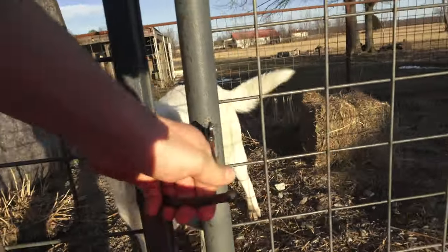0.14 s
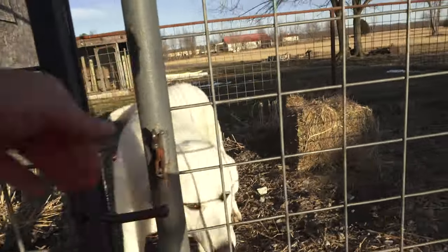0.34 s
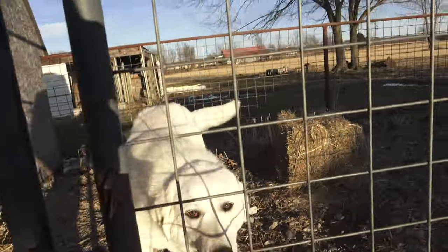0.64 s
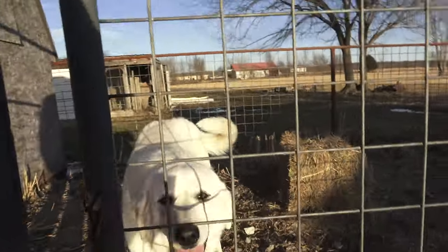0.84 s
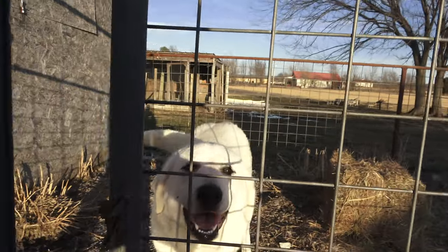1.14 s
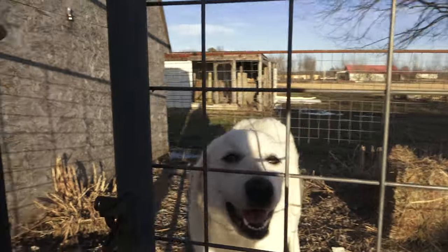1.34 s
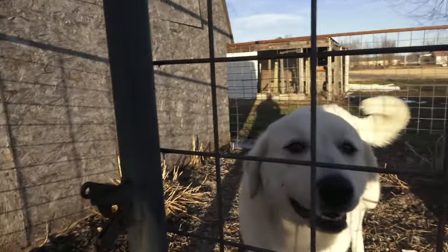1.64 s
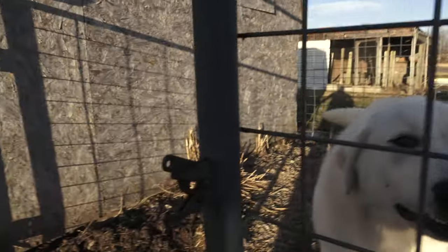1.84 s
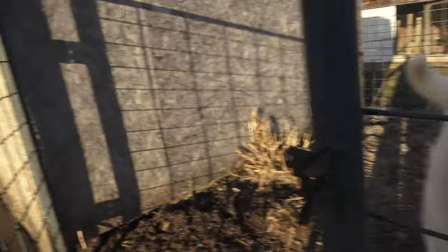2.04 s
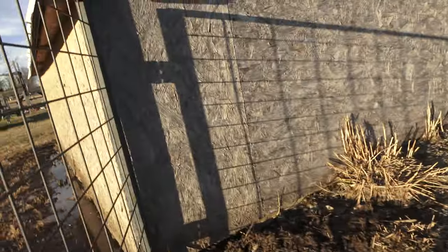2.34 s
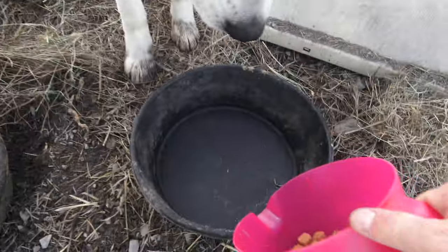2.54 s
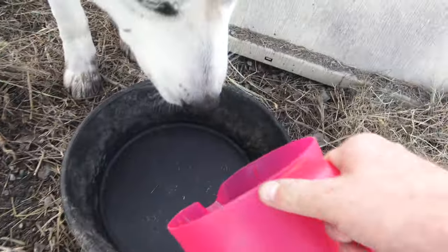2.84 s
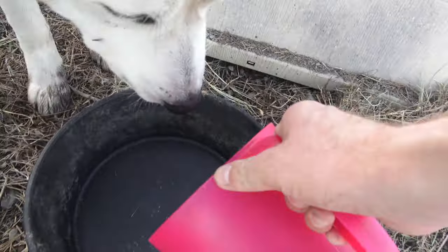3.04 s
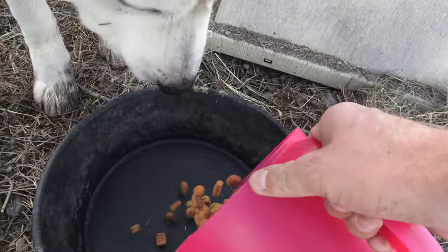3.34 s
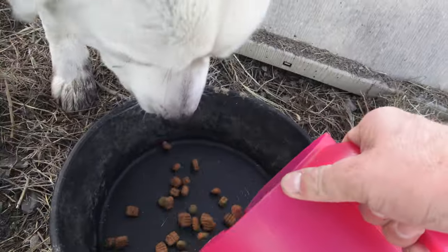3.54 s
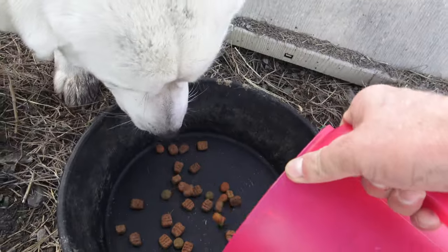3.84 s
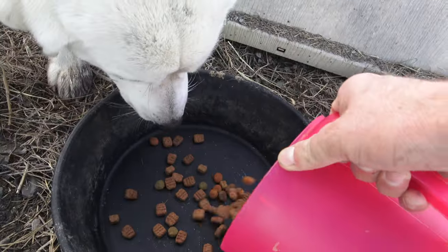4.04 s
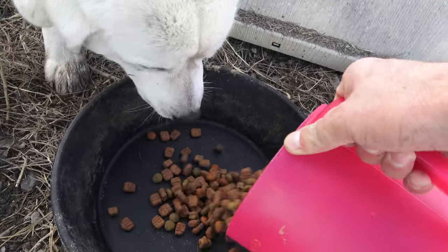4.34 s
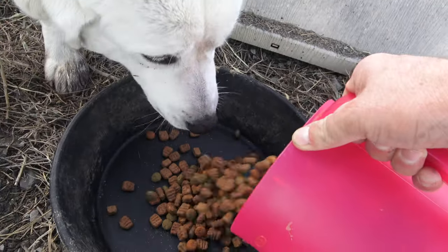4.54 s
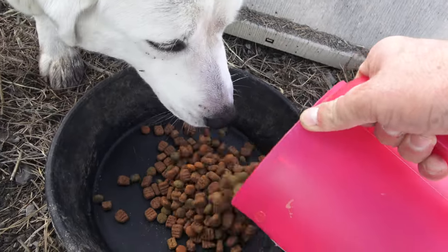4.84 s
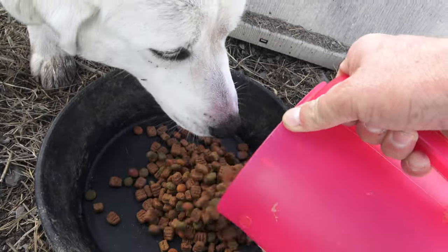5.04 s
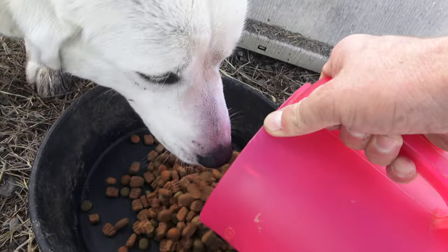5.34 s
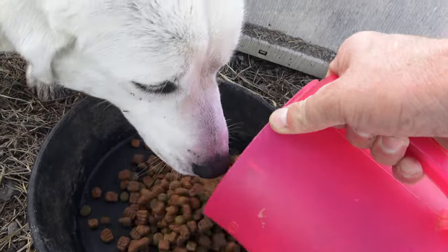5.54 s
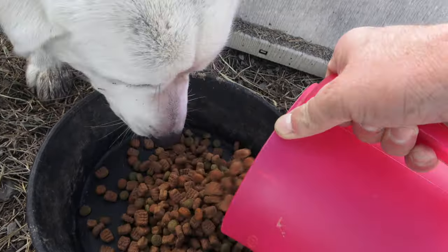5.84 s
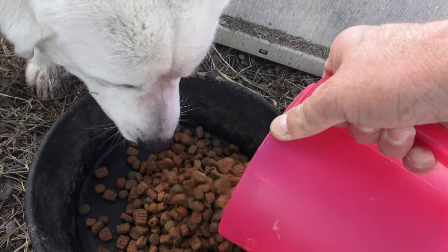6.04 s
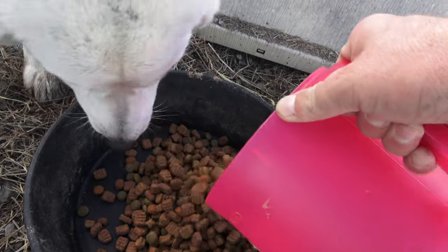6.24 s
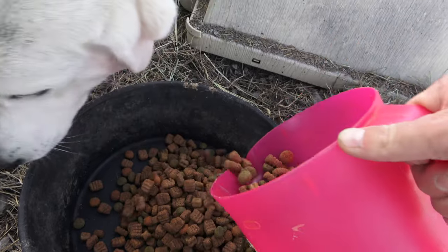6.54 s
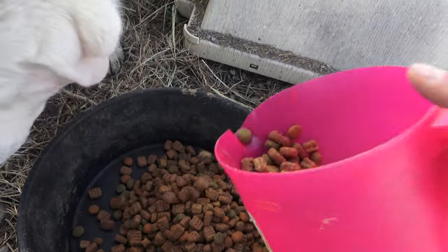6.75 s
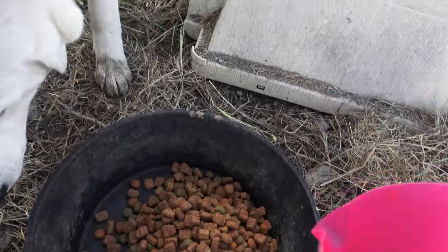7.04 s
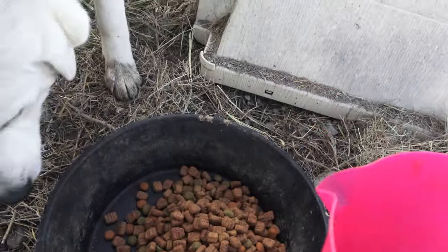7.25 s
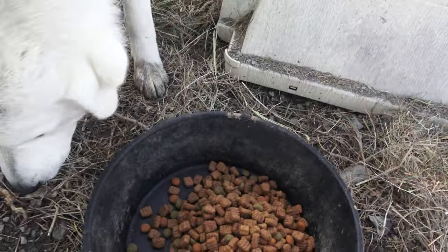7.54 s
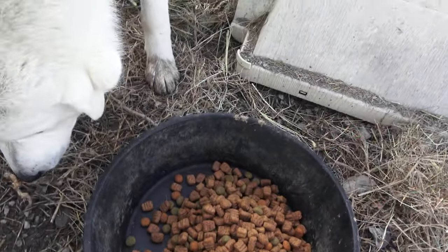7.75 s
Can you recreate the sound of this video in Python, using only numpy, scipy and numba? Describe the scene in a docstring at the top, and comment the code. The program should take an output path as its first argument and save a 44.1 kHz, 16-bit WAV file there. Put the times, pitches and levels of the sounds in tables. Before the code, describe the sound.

The scene is outdoors and close, with a soft hush of air and low wind rumble on the microphone. At the start a wire gate shimmers faintly, and its metal latch clicks at about 0.4 seconds. Footsteps brush and crunch through dry straw until about 2 seconds, with small stalk snaps and a low gust thump near 1.2 seconds. From 2.6 seconds, dry dog food rattles and clacks sharply in a plastic scoop. At 3.3 seconds the first pellets land in a rubber pan with hollow pocks. From 4 seconds the pour becomes a loud, dense clatter, the thuds softening as pellets click on the growing heap. It thins after 6.3 seconds and ends around 7. The remaining pellets slide back into the scoop with a short hollow rattle, and the scoop bumps the rim softly at 7.3 seconds. A faint straw rustle follows as the air fades.

```python
"""Kibble rattles in a plastic scoop and pours into a rubber pan: pellets thud on the bare bottom, then
click on the growing heap. The scoop tips upright, the rest slides back and the scoop bumps the pan rim.
Before the pour, a wire gate is latched and steps crunch over dry straw. Every pellet and stalk is a tiny
strike on a bank of damped modes. Underneath lie an outdoor hush and wind rumbling on the microphone."""
import sys
import numpy as np
from scipy import signal
from scipy.fft import rfft, irfft, next_fast_len
from scipy.io import wavfile
from scipy.ndimage import uniform_filter1d, minimum_filter1d
from numba import njit

SR = 44100
rng = np.random.default_rng(int(sys.argv[2]) if len(sys.argv) > 2 else 0)


def transcribe(signal):
    """Save signal, clipped to [-1, 1], as a 16-bit WAV file at the path in sys.argv[1]."""
    frames = np.atleast_2d(signal).T
    limited = np.clip(frames, -1, 1)
    pcm = np.round(limited * 32767).astype(np.int16)
    wavfile.write(sys.argv[1], SR, pcm)


N = 347447
TIME = np.arange(N) / SR
CONTROL_TIME = TIME[::100]   # coarse clock for envelopes

# Levels are relative within each table. A swell is a bell curve: t is its crest, width its sigma.
# hush of still air and distant country: t/s, level/dB
AIR_FADER = [(0, -31.5), (1.9, -34), (2.3, -38), (3.0, -29), (7.3, -37.5), (7.88, -46.5)]
# spectrum of that hush: f/Hz, level/dB
AIR_EQ = [(53, -32), (90, -15.5), (143, -11), (163, -17), (197, -17), (253, -17.5), (320, -14), (395, -18),
          (744, -13), (1230, -28), (1370, -27.5), (2930, -31), (7430, -50.5), (14000, -52)]
# spectrum of the wind rumble: f/Hz, level/dB
WIND_EQ = [(7.1, 3), (12, 13), (21, 3), (30, -15.5), (52, -12.5), (123, -32), (145, -35), (220, -38),
           (290, -35.5), (480, -120)]
# dull low thumps, gusts on the microphone and last the scoop bumping the pan rim: t/s, level/dB, width/s
THUMP_SWELLS = [(0.17, -17, 0.038), (1.175, -3.5, 0.026), (1.77, -17, 0.08), (7.314, -18, 0.0058)]
# spectrum of a thump: f/Hz, level/dB
THUMP_EQ = [(24, 2), (42, 2.5), (85, -14.5), (160, -30)]

# gate panel modes, each widened by many near-equal wires: f/Hz, bandwidth/Hz, level/dB, t60/s
PANEL_MODES = [(201, 18, -48, 3.4), (229.5, 11, -39.5, 11.3), (350, 28.3, -52, 1.66), (790, 50, -26, 0.84),
               (892, 82, -30, 2.3), (1350, 170, -36.5, 1.2), (2100, 260, -32, 1.8)]
# the latch drops: t/s, level/dB
LATCH_HIT = [(0.446, -0.5)]
# modes of latch and gate under that hit: f/Hz, level/dB, t60/s
LATCH_RING = [(880, -3.5, 0.034), (1130, 1, 0.015), (1420, -6, 0.02523), (1660, -6, 0.023),
              (2080, -1, 0.017), (2560, -0.5, 0.028), (3500, -11.5, 0.022), (5473.3, -18, 0.01735)]

# feet brushing through straw: t/s, level/dB, width/s
BRUSH_SWELLS = [(0.01, -28.5, 0.076), (0.39, -40.5, 0.064), (0.82, -33.5, 0.077), (1.03, -31.5, 0.058),
                (1.29, -36, 0.045), (1.68, -30.5, 0.098), (1.85, -27, 0.032), (2.04, -38.5, 0.041),
                (2.5, -32.5, 0.04), (7.63, -53, 0.076)]
# footfalls crushing straw: t/s, level/dB, width/s
FOOT_SWELLS = [(0.016, -21, 0.014), (0.825, -17, 0.012), (0.976, -15.5, 0.012), (1.366, -17.5, 0.021),
               (1.903, -18, 0.018)]
# single stalks snapping: t/s, level/dB, f/Hz
STALK_SNAPS = [(0.3541, -18.5, 1940), (0.6983, -20, 2777), (0.8078, -18, 3260), (0.9637, -12.5, 2410),
               (1.214, -24, 3746), (1.3553, -9, 1280), (1.729, -11.5, 2400), (2.0335, -17, 2830),
               (2.139, -22, 1350), (7.5642, -32, 1750)]
# spectrum of dry straw: f/Hz, level/dB
STRAW_EQ = [(300, -9.5), (450, -21), (880, -1.5), (1150, -14.5), (2400, -11), (3500, -11.5), (5500, -22.5),
            (7000, -29), (12500, -35), (16000, -41)]

# clumps of pellets shifting along the tilted scoop: t/s, level/dB, width/s
RATTLE_SWELLS = [(2.665, -18.5, 0.039), (2.87, -28.5, 0.031), (3.14, -14.5, 0.034), (3.25, -15, 0.042),
                 (3.36, -17, 0.037), (3.825, -20, 0.021), (3.98, -18, 0.013), (4.12, -22.5, 0.018),
                 (4.86, -19.5, 0.056), (5.29, -14.5, 0.031), (5.69, -23, 0.06), (6.08, -26, 0.014),
                 (6.21, -24, 0.025), (6.67, -36, 0.03)]
# hardest knocks of pellets on plastic and on each other: t/s, level/dB, f/Hz, crispness/dB
CLACK_HITS = [(2.599, 5, 3570, -18), (2.639, 2.5, 3040, -19), (2.658, -3.5, 3420, -21),
              (2.79, -7, 2900, -33), (2.836, -5, 2980, -25), (2.845, -7, 2700, -47),
              (2.969, -10, 1540, -40), (3.017, -6.5, 1650, -61), (3.06, 2, 2530, -59.5),
              (3.12, 6, 3260, -25), (3.137, 5, 1860, -29), (3.19, 1, 2980, -25), (3.205, 14, 3150, -18),
              (3.247, 2, 2810, -32), (3.271, 5, 2900, -42), (3.296, -3, 3070, -39.5), (3.359, 7, 2510, -29),
              (3.395, 4, 1410, -35), (3.434, -1, 2024, -33), (3.712, -4.5, 1680, -40),
              (3.757, 0.5, 2400, -27), (3.909, 4.5, 2480, -22), (3.945, -6.5, 1370, -32),
              (4.006, -1.5, 1910, -30.5), (4.067, -4, 1620, -30), (5.293, -1, 2590, -28),
              (6.611, -9.5, 2620, -43), (6.639, -4, 2634, -26), (6.88, -15, 2220, -32),
              (7.216, 5, 2860, -38), (7.297, -16, 2050, -43), (7.405, -11, 1540, -59)]
# spectrum of pellets on the plastic scoop: f/Hz, level/dB
SCOOP_EQ = [(350, -27.5), (700, 3.5), (1220, -14), (1900, -10.5), (2500, -11), (3000, -7.5), (4100, -18.5),
            (5500, -29.5), (7200, -49), (10400, -43), (16000, -60)]
# spectrum of pellets sliding back: f/Hz, level/dB
SLIDE_EQ = [(270, -3), (314, -0.5), (450, -13), (797, 2), (1070, -12), (1340, -12), (2900, -9), (3800, -12),
            (6300, -39), (10000, -63), (16000, -58)]
# air resonances of the upright scoop: f/Hz, bandwidth/Hz, level/dB
HOLLOW_MODES = [(320, 66, 13), (775, 140, 5), (1570, 254, 7), (2070, 210, 2), (2587, 720, 1)]

# pellets leaving the scoop, a first spill and then the main pour: t/s, level/dB
POUR_FLOW = [(3.28, -16.5), (3.5, 1), (3.65, -5), (3.76, -8), (3.96, -7.5), (4.058, -1.5), (4.4, 0),
             (4.9, -1), (5.13, -2.5), (5.4, -1.5), (5.85, -3), (6.17, -2), (6.3, -5.5), (6.6, -9),
             (6.8, -5.5), (6.94, -14), (7.05, -14.5)]
# heaviest landings on the rubber bottom: t/s, level/dB, f/Hz
PAN_HITS = [(3.308, -1, 563), (3.368, 11, 643), (3.397, 1, 490), (3.434, 2, 466), (3.47, 2, 474),
            (3.545, -0.5, 525), (3.576, -3.5, 552), (3.624, 1.5, 473), (3.712, -1, 550.4), (3.787, -9, 593),
            (3.834, 2.5, 484), (3.908, 6, 483.5), (3.943, -1, 770), (4.005, 3, 484), (4.077, 0, 590),
            (4.14, 2, 488), (4.257, 2, 503), (4.627, -3, 829), (4.764, -2.5, 777.6), (6.99, -9, 550)]
# spectrum of the rubber pan: f/Hz, level/dB
PAN_EQ = [(270, -9), (320, -25), (420, 3), (490, 8), (600, 1.5), (810, 4), (920, -3), (1090, -28),
          (1400, -14)]
# spectrum of pellet on pellet: f/Hz, level/dB
HEAP_EQ = [(900, -1), (1200, -5.5), (2000, -3.5), (3200, -5.5), (4000, -13), (5400, -15), (7500, -26),
           (11000, -30.5), (16000, -51)]
# sharp ticks of single crusts: t/s, level/dB
CRUST_TICKS = [(3.3662, -11), (3.492, -18), (3.55, -10.5), (3.5829, -17), (3.613, -11.5), (3.6427, -12),
               (3.8333, -9), (6.3525, -15), (6.4928, -19), (6.8249, -15), (6.989, -19)]
# spectrum of rough crusts grazing: f/Hz, level/dB
CRUST_EQ = [(3500, 16.5), (6000, -7.5), (10000, -8), (16000, -14)]

COVER_FROM_S, COVER_TAKES_S = 3.65, 0.6   # the heap spreads over the pan bottom
CUTOFF_HZ = 16000


def from_db(db):
    """Decibels to gain."""
    return 10 ** (np.asarray(db) / 20)


def unit_rms(x):
    """Scale to rms 1."""
    return x / np.sqrt(np.mean(x ** 2) + 1e-20)


def fader(t, db):
    """Smooth gain per sample from a dB curve, silent outside it."""
    return uniform_filter1d(from_db(np.interp(TIME, t, db, left=-120, right=-120)), SR // 100)


def swells(rows):
    """Sum bell-shaped swells into one gain curve on the control clock."""
    return sum(from_db(db) * np.exp(-.5 * np.minimum(((CONTROL_TIME - t) / width) ** 2, 60))
               for t, db, width in rows)


def audible(gain):
    """Times and dB of a control curve, trimmed to its audible stretch."""
    heard = np.flatnonzero(gain > 1e-4)
    stretch = slice(heard[0], heard[-1])
    return CONTROL_TIME[stretch], 20 * np.log10(gain[stretch])


def eq_db(eq, hz):
    """Read an EQ curve on a log-frequency axis."""
    freq, db = np.transpose(eq)
    return np.interp(np.log(hz), np.log(freq), db)


def low_cut(x, hz):
    """Steep high-pass: small bodies radiate no bass."""
    return signal.sosfilt(signal.butter(6, hz, "high", fs=SR, output="sos"), x + 1e-18)


def levelled(x, window_s):
    """Ride the gain to hold the short-term rms near 1."""
    size = max(int(window_s * SR), 2)
    power = uniform_filter1d(uniform_filter1d(x ** 2, size), size)
    return x / np.sqrt(np.abs(power) + 1e-4 * np.mean(x ** 2))


def noise(eq):
    """Steady noise at rms 1, shaped by an EQ curve and rolled off steeply past its ends."""
    size = next_fast_len(N, real=True)
    hz = np.arange(1, size // 2 + 2) * SR / size
    roll_off = 1 / (1 + (eq[0][0] / hz) ** 4) / (1 + (hz / eq[-1][0]) ** 4)
    spectrum = rfft(rng.standard_normal(size)) * from_db(eq_db(eq, hz)) * roll_off
    return unit_rms(irfft(spectrum, size)[:N])


def ring(clicks, hz, t60):
    """A unit click starts a decaying sine of height 1."""
    decay, omega = from_db(-60 / (t60 * SR)), 2 * np.pi * hz / SR
    return signal.lfilter([0, np.sin(omega)], [1, -2 * decay * np.cos(omega), decay ** 2], clicks + 1e-18)


@njit
def mode_bank(onsets, kicks, a1, a2, size):
    """Two-pole resonators, kicked at the sorted sample indices in onsets."""
    out, hit = np.zeros(size), 0
    now, before = np.zeros(len(a1)), np.zeros(len(a1))
    for i in range(size):
        while hit < len(onsets) and onsets[hit] == i:
            now += kicks[hit]
            hit += 1
        for m in range(len(a1)):
            out[i] += now[m]
            now[m], before[m] = a1[m] * now[m] - a2[m] * before[m] + 1e-18, now[m]
    return out


def strike(t, db, pitch, crisp_db, eq, cycles, focus_db, focus_octaves):
    """Each contact rings a dense set of damped modes, boosted by focus_db around its own pitch."""
    hz = np.geomspace(eq[0][0], min(eq[-1][0], CUTOFF_HZ), num=44)
    hz = hz * (hz[1] / hz[0]) ** rng.uniform(-0.43, 0.47)   # detune the whole bank
    t60 = cycles / hz + .003
    focus = np.exp(-.5 * (np.log2(hz / pitch[:, None]) / focus_octaves) ** 2)
    treble_shelf = 1 / (1 + (5500 / hz) ** 6)
    kicks = from_db(eq_db(eq, hz) + focus_db * focus + np.outer(crisp_db, treble_shelf)) * np.sqrt(hz)
    scatter = rng.uniform(-1, 1, kicks.shape)
    kicks *= scatter + .5 * np.sign(scatter)
    kicks *= (from_db(db) / np.linalg.norm(kicks, axis=1))[:, None]
    # high modes die sooner, so they start higher for the same energy
    kicks *= np.sqrt(np.interp(np.median(pitch), hz, t60) / t60)
    onsets = np.clip((t * SR).astype(int), 0, N - 1)
    order = np.argsort(onsets)
    start, end = onsets.min(), min(onsets.max() + SR // 8, N)
    decay, omega = from_db(-60 / (t60 * SR)), 2 * np.pi * hz / SR
    ringing = mode_bank(onsets[order] - start, kicks[order] * np.sin(omega),
                        2 * decay * np.cos(omega), decay ** 2, end - start)
    ringing = signal.sosfilt(signal.butter(2, hz[0], "high", fs=SR, output="sos"), ringing)
    return np.pad(ringing, (start, N - end))


def grains(t, db, eq, crisp_db, per_s, spread_db, cycles, focus_db, window_s, banks):
    """A cloud of random strikes, on one mode bank after another; a weaker flow is quieter and sparser."""
    times = np.arange(t[0], t[-1], 1 / per_s)
    jitter, size, tuning, chance = rng.random((len(times), 4)).T
    times = times + 2 * jitter / per_s
    density = np.sqrt(from_db(np.interp(times, t, db) - np.max(db)))
    grain_db = spread_db * np.minimum(-np.log(1 - size), 3) - 30 * (chance > density)
    pitch = eq[0][0] * (eq[-1][0] / eq[0][0]) ** tuning
    contacts = np.array([times, grain_db, pitch, np.full(len(times), crisp_db)])
    cloud = sum(strike(*batch, eq, cycles, focus_db, focus_octaves=0.21)
                for batch in np.array_split(contacts, banks, axis=1))
    return fader(t, db) * levelled(cloud, window_s)


def air():
    """The bed: a soft hush of still air and distant country."""
    return fader(*np.transpose(AIR_FADER)) * noise(AIR_EQ)


def wind():
    """Slow lumps of pressure; the rumble drops as the microphone is lowered to the pan."""
    lowering_s, open_db, sheltered_db = (2.43, 4.8), -13, -29
    rumble_db = np.interp(TIME, lowering_s, [open_db, sheltered_db])
    return from_db(rumble_db) * levelled(noise(WIND_EQ), window_s=0.067)


def low_thumps():
    """Dull swells of low noise: gusts on the microphone, and last the scoop bumping the pan rim."""
    return fader(*audible(swells(THUMP_SWELLS))) * levelled(noise(THUMP_EQ), window_s=0.043)


def reflections(x, t60, dull_hz):
    """A brief, dull scatter off the pan wall, the ground and the shed."""
    t = TIME[:SR // 4]
    tail = rng.standard_normal(len(t)) * from_db(-60 * t / t60) * (t > .0015)
    wet = signal.fftconvolve(x, tail / np.linalg.norm(tail))[:N]
    return signal.sosfilt(signal.butter(1, dull_hz, fs=SR, output="sos"), wet)


def gate():
    """The wire panel still shimmers from being pulled shut as the latch drops into its catch."""
    panel = 0
    for hz, width, db, t60 in PANEL_MODES:
        band = signal.butter(2, [hz - width / 2, hz + width / 2], "band", fs=SR, output="sos")
        wires = unit_rms(signal.sosfilt(band, rng.standard_normal(N)))
        panel += wires * from_db(db - 60 * TIME / t60)
    (hit_s, hit_db), = LATCH_HIT
    drop = signal.unit_impulse(N, int(hit_s * SR))
    latch = sum(ring(drop, hz, t60) * from_db(db) * (-1) ** k for k, (hz, db, t60) in enumerate(LATCH_RING))
    return panel + from_db(hit_db - 12.5) * latch


def straw_steps():
    """Dry stalks swish past the feet and crush under them; a few snap singly."""
    rustle_db, walk_end_s = -45, 2.15
    t, db = audible(swells(BRUSH_SWELLS) + from_db(rustle_db) * (CONTROL_TIME < walk_end_s))
    brush = grains(t, db, STRAW_EQ, crisp_db=-2.1, per_s=1400, spread_db=4,
                   cycles=30, focus_db=12, window_s=0.048, banks=10)
    t, db = audible(swells(FOOT_SWELLS))
    crush = grains(t, db, STRAW_EQ, crisp_db=-4.5, per_s=500, spread_db=3,
                   cycles=30, focus_db=16, window_s=0.015, banks=4)
    t, db, pitch = np.transpose(STALK_SNAPS)
    snaps = strike(t, db, pitch, 0, STRAW_EQ, cycles=48, focus_db=12, focus_octaves=0.38)
    return brush + crush + snaps


def scoop_rattle():
    """Pellets rattle over the plastic towards the lip in surges."""
    t, db = audible(swells(RATTLE_SWELLS))
    rattle = grains(t, db, SCOOP_EQ, crisp_db=0, per_s=900, spread_db=7.5,
                    cycles=12, focus_db=11.5, window_s=0.012, banks=4)
    return low_cut(rattle, hz=214)


def scoop_slide():
    """The last pellets slide back and sound the hollow of the upright scoop: quick rise, hold, fall."""
    hold_from_s, hold_to_s, rise_db_per_s, fall_db_per_s = 7.095, 7.315, 305.5, 230.5
    early, late = np.clip(hold_from_s - CONTROL_TIME, 0, 1), np.clip(CONTROL_TIME - hold_to_s, 0, 1)
    t, db = audible(from_db(-17 - rise_db_per_s * early - fall_db_per_s * late))
    slide = grains(t, db, SLIDE_EQ, crisp_db=6.6, per_s=650, spread_db=5.5,
                   cycles=38, focus_db=6, window_s=0.052, banks=3)
    hollow = sum(from_db(mode_db) * signal.lfilter(*signal.iirpeak(hz, hz / width, fs=SR), slide)
                 for hz, width, mode_db in HOLLOW_MODES)
    return low_cut(slide + from_db(-5.5) * hollow, hz=214)


def scoop_clacks():
    """Hard accents: each pellet knocks, then tumbles and touches twice more, softer and duller."""
    t, db, pitch, crisp_db = np.transpose(CLACK_HITS)
    edge_db = crisp_db - np.median(crisp_db) + 5
    knocks = strike(t, db, pitch, edge_db, SCOOP_EQ, cycles=17.5, focus_db=10, focus_octaves=0.05)
    t, db, pitch, edge_db = np.repeat([t, db - 7, pitch, edge_db - 4], 2, axis=1)
    t = t + rng.uniform(.0006, .004, len(t))
    tumbles = strike(t, db, pitch, edge_db, SCOOP_EQ, cycles=11.6, focus_db=11, focus_octaves=0.68)
    return low_cut(knocks + tumbles, hz=330)


def pour_controls():
    """Times, flow in dB and the share of the pan bottom that the heap covers."""
    t, flow_db = audible(fader(*np.transpose(POUR_FLOW))[::100])
    return t, flow_db, np.clip((t - COVER_FROM_S) / COVER_TAKES_S, .05, 1)


def handfuls(t, swing_db=1.66, spacing_s=0.045):
    """A random wobble of the flow in dB: pellets tumble in handfuls."""
    knots = np.arange(0, N / SR, spacing_s)
    return swing_db * np.interp(t, knots, rng.uniform(-0.82, 1, len(knots)))


def stray_bounces():
    """Stray pellets bounce hard off the bare bottom and more softly off the heap."""
    t, flow_db, covered = pour_controls()
    knocks = grains(t, -22.5 + flow_db - 4 * covered, HEAP_EQ, crisp_db=-5.5, per_s=85, spread_db=8,
                    cycles=18, focus_db=10, window_s=0.18, banks=3)
    return low_cut(knocks, hz=596)


def pan_thuds():
    """The rubber bottom answers each pellet with a low pock that softens and deepens under the heap."""
    t, db, pitch = np.transpose(PAN_HITS)
    thuds = from_db(4) * strike(t, db, pitch, 0, PAN_EQ, cycles=12, focus_db=14.5, focus_octaves=0.15)
    t, flow_db, _ = pour_controls()
    cushion_db = 3.5 * np.maximum(t - COVER_FROM_S - COVER_TAKES_S, 0)
    drumming = grains(t, -11.5 + flow_db - cushion_db, PAN_EQ, crisp_db=0, per_s=330, spread_db=3.6,
                      cycles=21, focus_db=8, window_s=0.06, banks=8)
    bottom = thuds + drumming
    load = np.clip((TIME - 3.9) / 0.7, 0, 1)   # the heap's weight lets in more low end
    return low_cut(bottom * (1 - load), hz=300) + low_cut(bottom * load, hz=210)


def heap_clicks():
    """Pellets click against each other on the heap; their rough crusts graze and tick."""
    t, flow_db, covered = pour_controls()
    flow_db = flow_db + handfuls(t)
    # pellets meet in pairs, so clicks and grazes grow faster than the flow
    click_db = -21.5 + 2 * flow_db + 20 * np.log10(covered)
    graze_db = -36 + 3 * flow_db
    clicks = grains(t, click_db, HEAP_EQ, crisp_db=-1.3, per_s=800, spread_db=4.5,
                    cycles=51.4, focus_db=11, window_s=0.1, banks=12)
    grazes = grains(t, graze_db, CRUST_EQ, crisp_db=0, per_s=1300, spread_db=7.5,
                    cycles=17, focus_db=9, window_s=0.055, banks=3)
    t, db = np.transpose(CRUST_TICKS)
    ticks = strike(t, db, np.full(len(t), 7000), 0, CRUST_EQ, cycles=19, focus_db=24, focus_octaves=0.61)
    return low_cut(clicks, hz=484) + grazes + ticks


def scene():
    """Close mono mix: gate, steps and kibble with light reflections, over wind, low thumps and air."""
    close = gate() + straw_steps()
    close += scoop_rattle() + scoop_slide() + from_db(3) * scoop_clacks()
    close += pan_thuds() + heap_clicks() + stray_bounces()
    wet = from_db(-12) * reflections(close, t60=0.044, dull_hz=4860)
    return (close + wet + wind() + low_thumps() + air())[None]


def record(dry):
    """A fast limiter holds the loudest knocks near full scale, then a steep high cut trims the top."""
    release_db_per_s = 900
    over_db = 20 * np.log10(np.maximum(np.abs(dry[0]), 1))
    release_db = release_db_per_s * TIME
    reduction_db = np.maximum.accumulate(over_db + release_db) - release_db
    gain = uniform_filter1d(minimum_filter1d(from_db(-reduction_db), size=25), size=25)
    high_cut = signal.ellip(10, .1, 70, CUTOFF_HZ, fs=SR, output="sos")
    return signal.sosfilt(high_cut, dry * gain)


dry = scene()
out = record(dry)
transcribe(out)
```